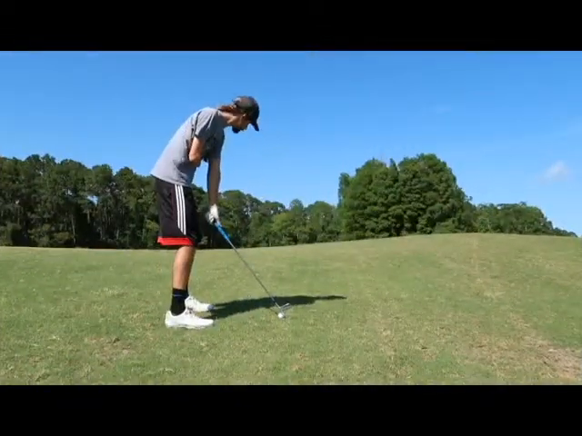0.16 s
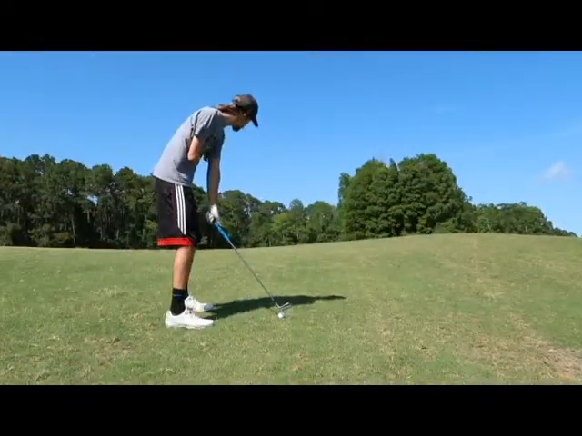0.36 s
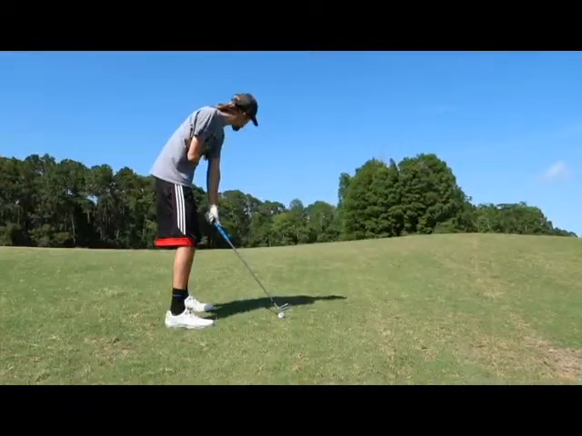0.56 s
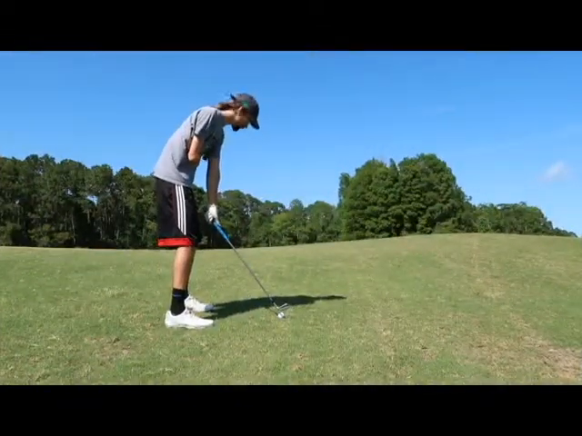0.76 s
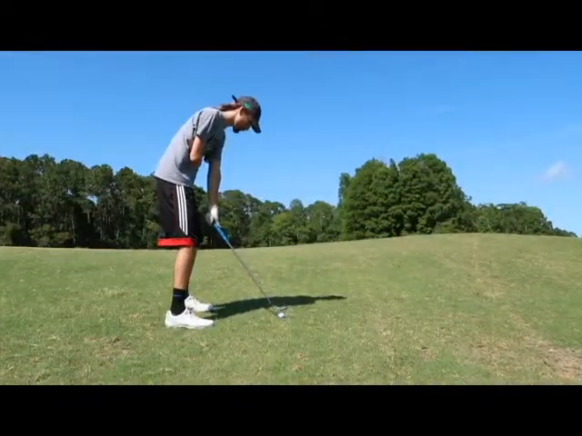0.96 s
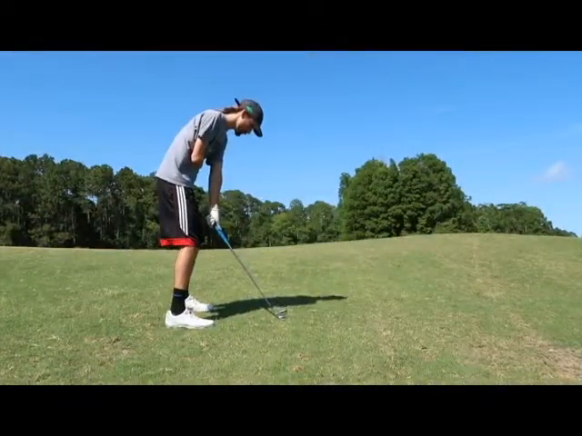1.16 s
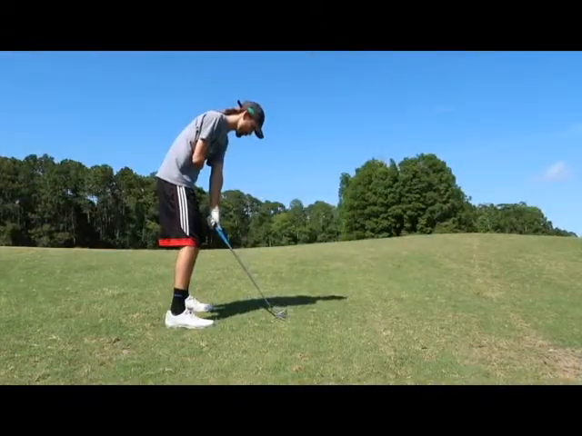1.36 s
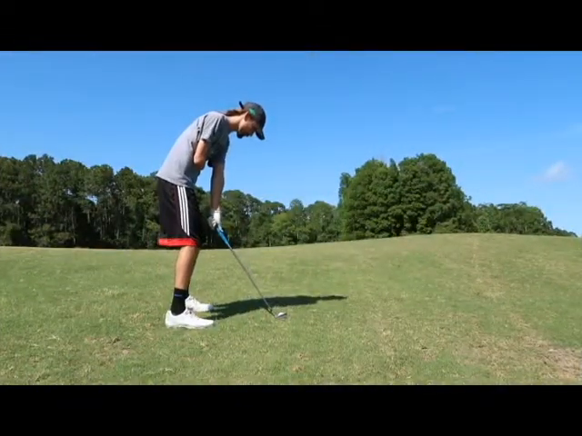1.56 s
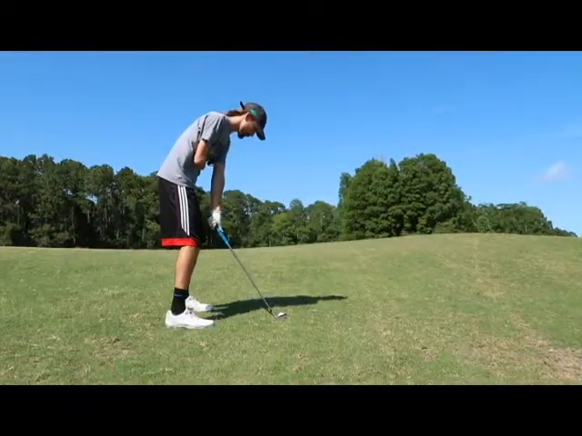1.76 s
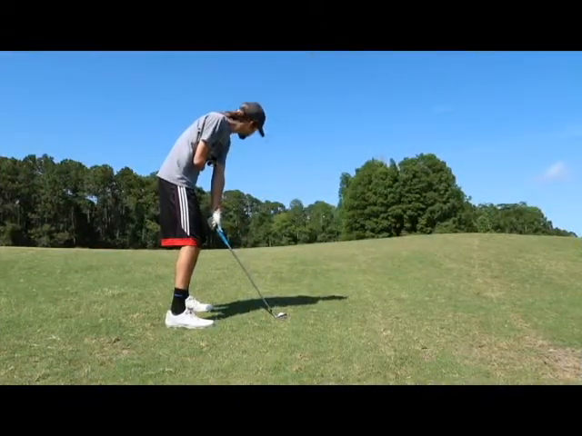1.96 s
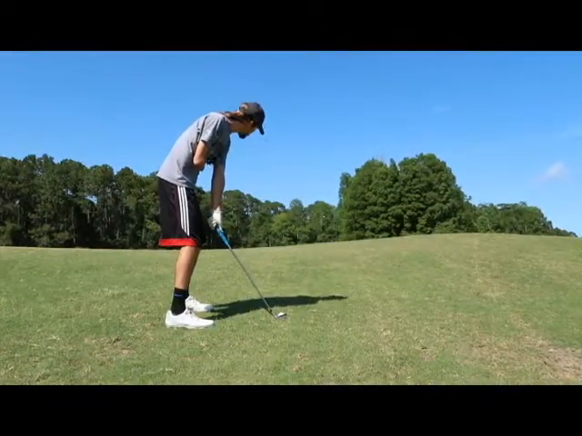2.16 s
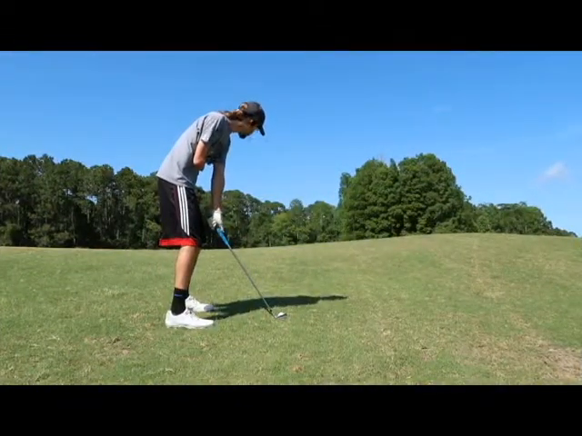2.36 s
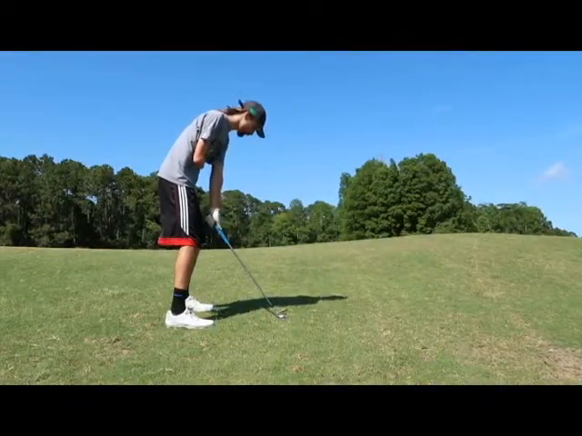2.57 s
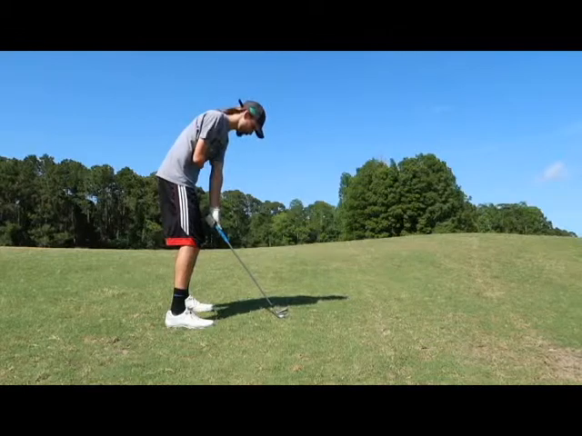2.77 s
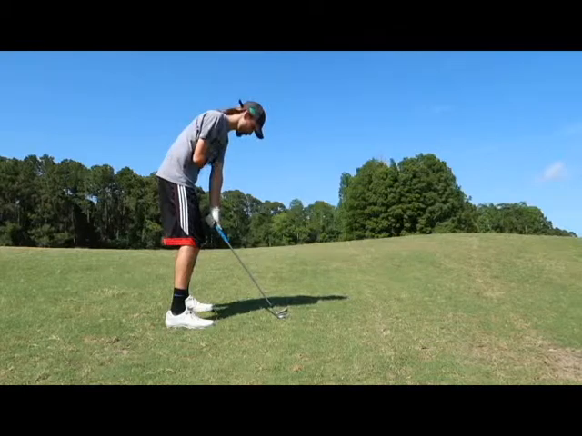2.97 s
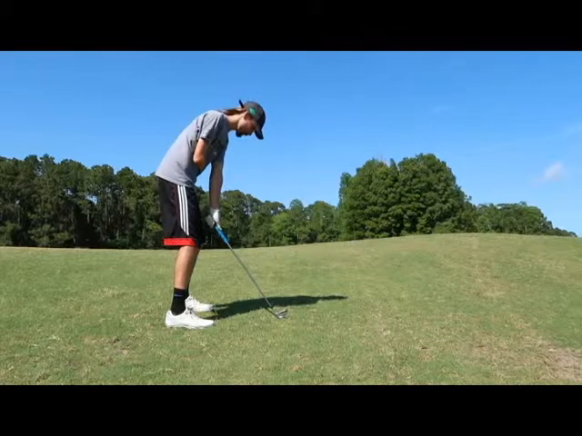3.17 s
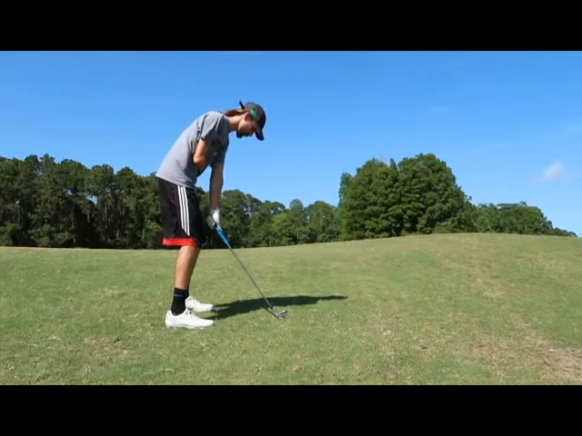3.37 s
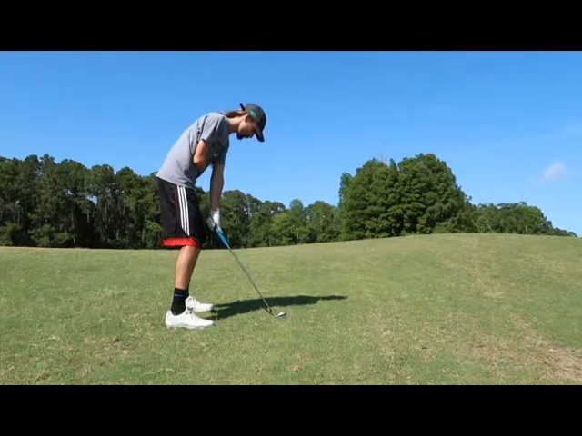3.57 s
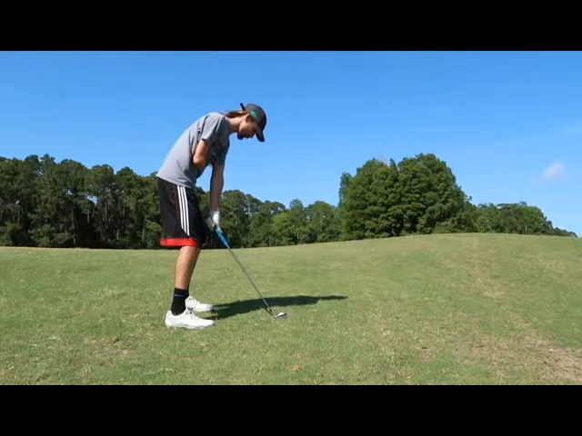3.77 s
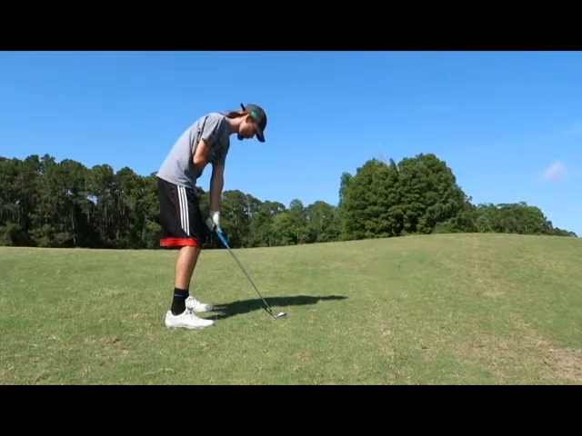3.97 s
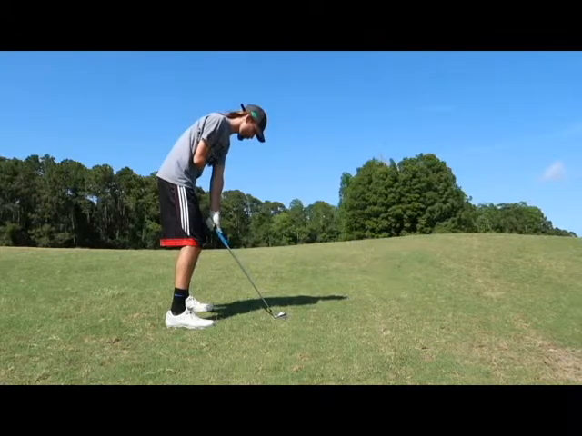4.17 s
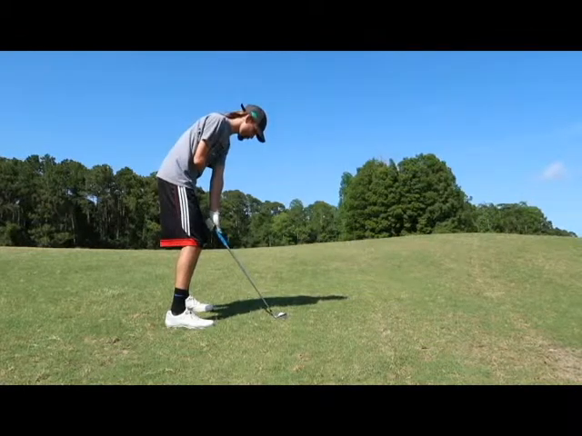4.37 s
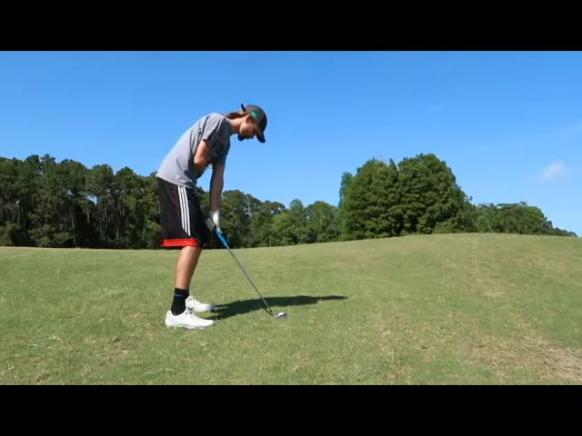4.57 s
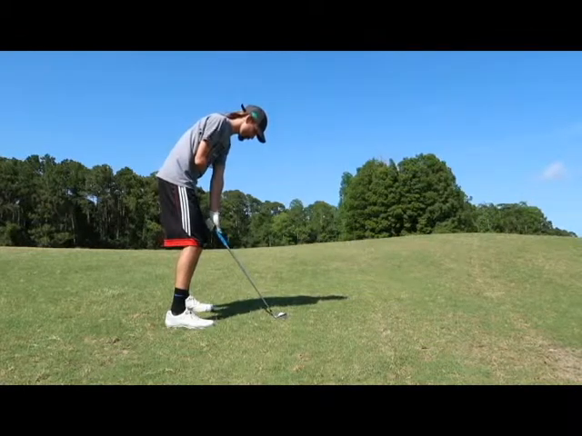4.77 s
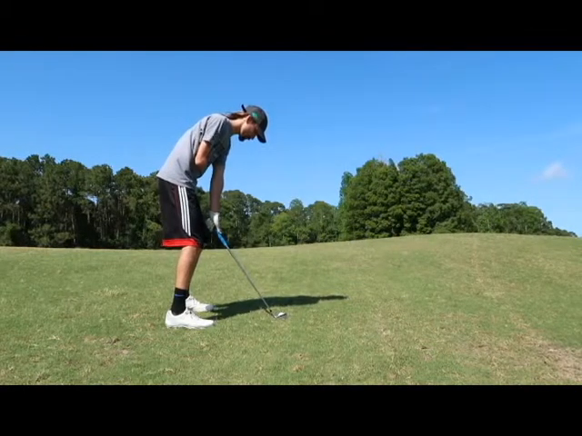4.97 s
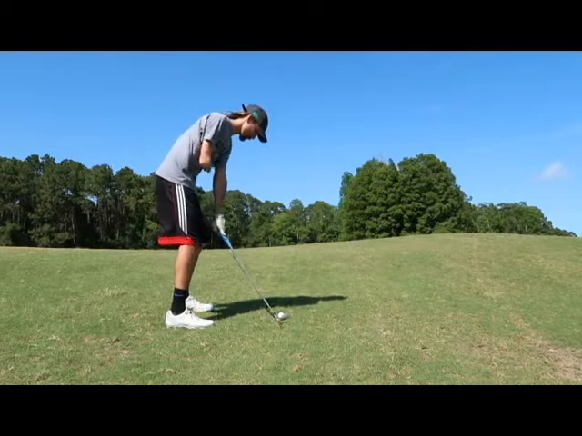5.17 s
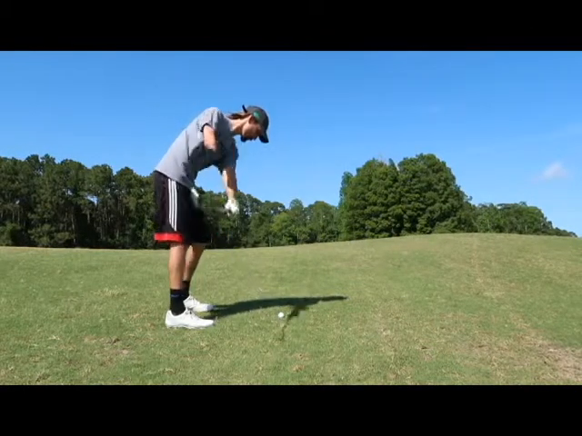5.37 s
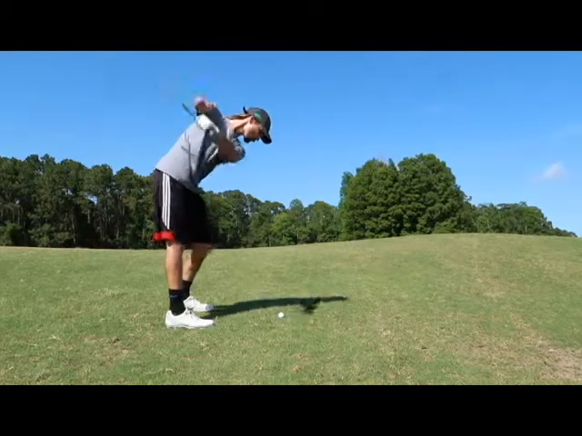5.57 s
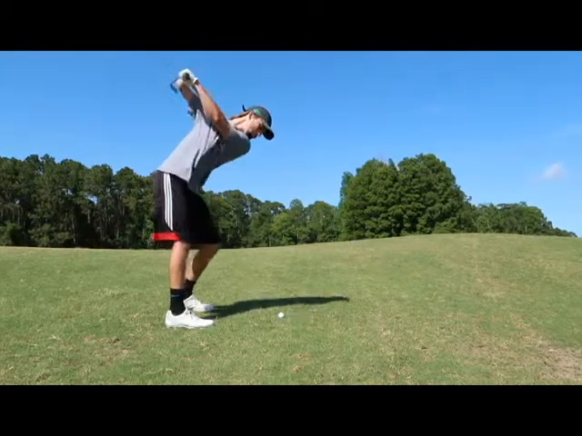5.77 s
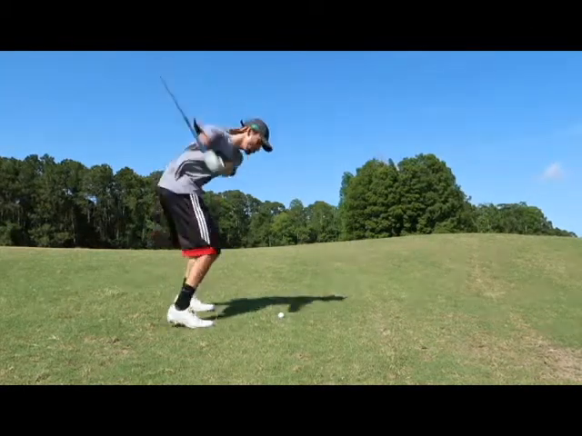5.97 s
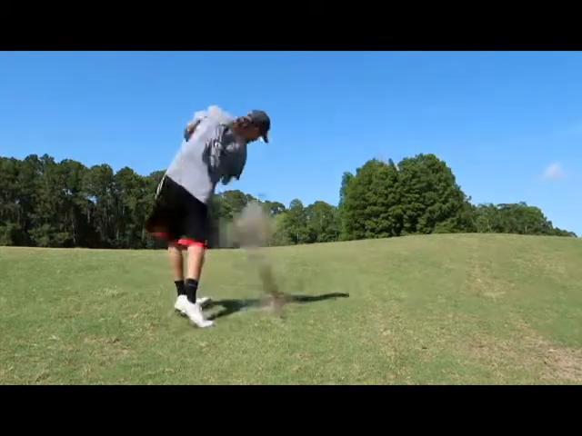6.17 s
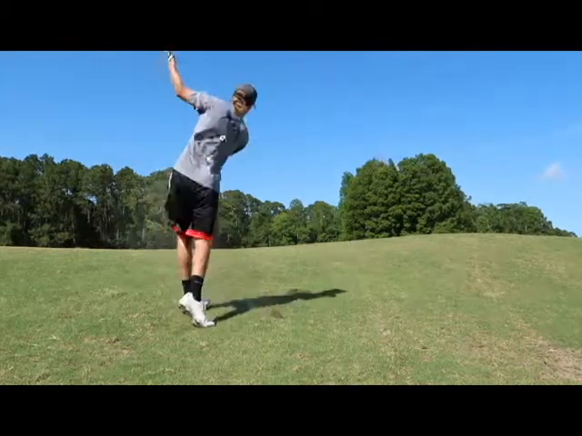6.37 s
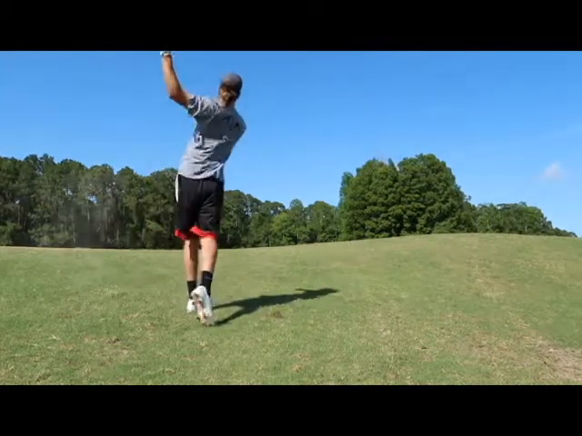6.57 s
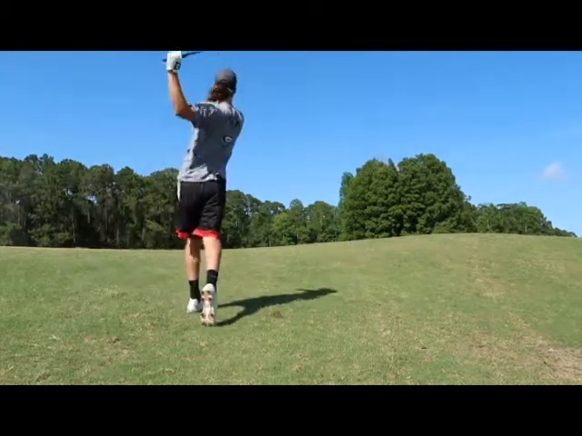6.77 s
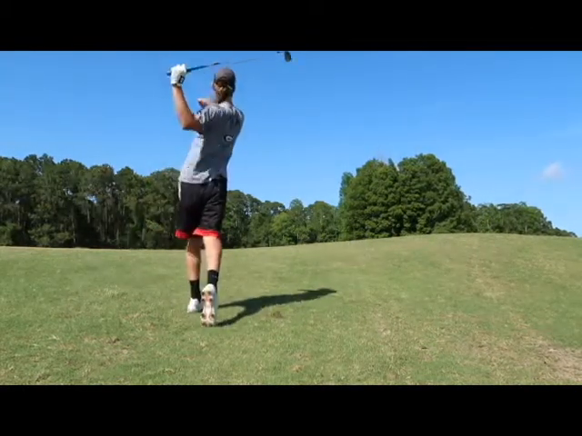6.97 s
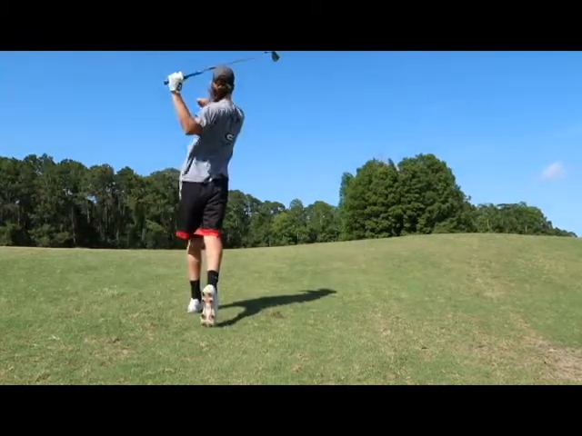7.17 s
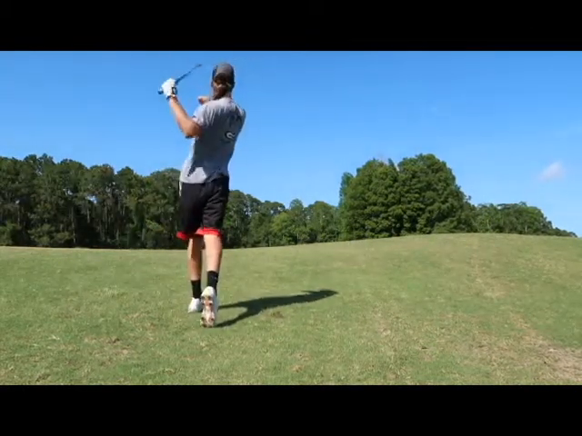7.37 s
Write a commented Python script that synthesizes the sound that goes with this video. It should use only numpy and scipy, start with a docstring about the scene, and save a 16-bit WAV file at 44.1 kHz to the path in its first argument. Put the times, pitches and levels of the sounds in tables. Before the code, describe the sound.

Outdoors on an open golf course, a far mower drones low and steady, its pulsing clatter coming and going in moving air. Wind bursts roughly against the microphone before the middle, then drops away. Late on, a club gives a brief rising swish and hits the ball with one dry, sharp crack and a short turf thud. Wind gusts return at the end. Close stereo camera microphone with faint hiss.

```python
"""An open fairway in gusty air, heard at two close microphone ports. A far four-cylinder mower drones as harmonics
of its firing rate and clatters as pulsed, coloured noise, all of it fading in the moving air.
Wind buffets the ports as swelling, coloured noise, with single gusts and tiny overload clicks. A golfer swings an
iron: the shaft swishes as gliding vortex noise, then contacts ring club head and ball while turf tears and thuds.
Loud spells make the camera's gain control duck."""
import sys
import numpy as np
from scipy import signal
from scipy.fft import rfft, irfft, next_fast_len
from scipy.io import wavfile
from scipy.ndimage import uniform_filter1d, map_coordinates

SR = 44100
rng = np.random.default_rng(int(sys.argv[2]) if len(sys.argv) > 2 else 0)


def to_wav(s):
    """Save 16-bit WAV."""
    ch = np.atleast_2d(s).T  # columns
    pcm = np.round(np.clip(ch, -1, 1) * 32767)  # PCM
    wavfile.write(sys.argv[1], SR, pcm.astype(np.int16))


N = 326781
T = np.arange(N) / SR  # time [s]

# Spectra below give relative levels: the coloured noise is scaled to rms 1, a snap to peak 1.

# rumble of the far outdoors: (frequency [Hz], level [dB per Hz])
DISTANCE_SPECTRUM = [(20, -24.5), (45, -8), (70, 4), (130, 5.5), (250, 3.5), (450, 0), (700, -4),
                     (1300, -10.5), (3000, -59)]
# microphone hiss: (frequency [Hz], level [dB per Hz])
HISS_SPECTRUM = [(500, -20), (1200, 4), (3000, 3), (4500, -3), (6000, -7.5), (8000, -11.5), (11000, -17.5),
                 (11900, -15), (12400, -50), (14000, -78)]

# speed of the governed engine: (time [s], firing rate [firings per s])
FIRING_RATE = [(0, 75.7), (2.2, 75.5), (4, 75.1), (7.4, 75.05)]
# strength of the four cylinders in firing order: level [dB]
CYLINDER_LEVELS = [0, -5.5, -6, -4]
# drone as the air carries it:
# (time [s], fundamental [dB], second harmonic [dB], low overtones [dB], high overtones [dB])
DRONE_LEVELS = [(0, -36.5, -38.5, -40.5, -48.5), (.75, -36.5, -40, -40, -57), (1.1, -36, -39, -39.5, -48.5),
                (1.55, -42.5, -43.5, -43.5, -48.5), (1.8, -35, -40.5, -53, -58),
                (2.2, -34.5, -38, -50, -53.5), (2.7, -35.5, -41, -42, -55), (3.3, -54, -54, -50, -51),
                (3.9, -45, -48.5, -53, -61), (4.3, -55, -45.5, -51.5, -56), (4.8, -49, -47.5, -53, -72),
                (5.3, -46, -48, -60, -57), (5.8, -46.5, -53.5, -58.5, -64), (7.4, -45.5, -42.5, -46, -67)]
# low exhaust overtones: (multiple of the firing rate, relative level [dB])
EXHAUST_TONES = [(3, -0.5), (4, -7), (5, -15), (6, -15.5)]
# high overtones from the engine block, before rounding to quarters:
# (multiple of the firing rate, relative level [dB])
BLOCK_OVERTONES = [(8, -2.5), (9.25, -11.5), (10.75, -6), (11, -3.5), (12.5, -5.5)]
# lines of the far machine whine: (frequency [Hz], relative level [dB])
WHINE_LINES = [(452, -53.5), (511.4, -56.5), (619, -61.5), (694, -57), (770, -61.5)]
# the whine as it comes and goes: (time [s], relative level [dB])
WHINE_LEVEL = [(0, -20), (2.8, -1.5), (3.6, 1.5), (4.8, -1.5), (5.8, 1), (7.4, -38)]

# engine clatter as the wind carries it, before trims:
# (time [s], knock level [dB], rattle level [dB], lag of the second path through the air [ms])
CLATTER_LEVELS = [(0, -35.5, -45, 0.85), (.2, -40.5, -51, 0.95), (.35, -39, -55, 0.85),
                  (.58, -51.5, -61, 0.9), (.76, -50.5, -48, 0.85), (.9, -43, -59, 0.97),
                  (1.07, -35, -69, 0.97), (1.2, -43, -51, 0.82), (1.32, -35.5, -46.5, 0.8),
                  (1.39, -38, -49, 0.98), (1.47, -28, -50, 0.86), (1.58, -32.5, -41.5, 0.87),
                  (1.68, -36.5, -49.5, 0.81), (1.78, -44, -55, 0.88), (1.88, -43, -45, 0.81),
                  (2.12, -42, -48.5, 0.86), (2.4, -36.5, -47, 0.83), (3, -45, -65, 0.93),
                  (3.25, -36.5, -56, 1.3), (3.42, -45.5, -52, 0.83), (3.65, -37.5, -56, 0.76),
                  (3.88, -37.5, -42.5, 0.76), (4.05, -45.5, -64, 0.95), (4.2, -42.5, -55, 0.67),
                  (4.33, -39.5, -49.5, 0.82), (4.44, -40, -59, 0.78), (4.56, -43, -58, 0.87),
                  (4.8, -49, -56, 0.73), (5.02, -44.5, -53.5, 0.81), (5.2, -43.5, -54.5, 0.74),
                  (5.43, -42.5, -53, 0.78), (5.7, -40, -60, 0.7), (6.3, -55, -58, 0.88),
                  (6.58, -56, -58, 0.84), (6.72, -47, -56, 0.65), (6.9, -50, -55, 0.78),
                  (7.41, -63.5, -60, 0.81)]
# level of the rattle's treble: (time [s], level [dB])
TREBLE_LEVEL = [(0, -58), (.25, -68), (1.45, -67), (1.6, -58), (1.75, -69), (2.2, -59), (2.5, -57),
                (2.9, -68), (3.3, -57), (3.65, -62.5), (3.88, -56), (4.1, -72), (4.55, -60.5), (4.85, -69),
                (5.1, -59), (5.25, -65), (5.45, -55.5), (5.7, -66.5), (7.41, -67.5)]
# the knocking block: (frequency [Hz], level [dB per Hz])
KNOCK_SPECTRUM = [(350, -12), (590, -8), (700, 4), (850, 4.5), (1050, -1.5), (1280, -2), (1700, -8.5),
                  (2300, -18), (4000, -51), (12000, -69)]
# the rattling covers: (frequency [Hz], level [dB per Hz])
RATTLE_SPECTRUM = [(900, -22), (1600, 3), (1950, 9), (2200, -2), (2600, 2), (2950, -9), (3300, -19.5),
                   (3700, -15.5), (4600, -23), (8000, -44.5), (12000, -79.5)]
# the rattle's treble: (frequency [Hz], level [dB per Hz])
TREBLE_SPECTRUM = [(2300, -24), (2850, 2.5), (3300, -2.5), (3800, -15.5), (5000, -38), (12000, -78.5)]
BLOW_SCATTER_DB = 1.5
ECHO_SHARE = 0.21  # steady floor under the blows, as a gain

# strength of the wind at the ports, before trim: (time [s], level [dB])
WIND_LEVEL = [(0, -45.5), (1.68, -41.5), (1.82, -35.5), (2, -34.5), (2.25, -38.5), (2.36, -23.5),
              (2.62, -18), (2.85, -26.5), (3.3, -49), (3.9, -57.5), (4.75, -56.5), (5, -70), (6.15, -59.5),
              (6.41, -31), (6.58, -31.5), (6.8, -37), (7.1, -30), (7.41, -30.5)]
# single gusts that hit the ports:
# (start [s], length [s], level [dB], centre [Hz], small eddies against the large [dB])
GUST_EVENTS = [(0.539, 0.078, -31.5, 193, -38), (1.021, 0.012, -26.5, 260, -20),
               (1.159, 0.022, -22, 230, -34), (1.305, 0.0067, -26.5, 253, -30),
               (1.563, 0.0048, -26.5, 255, -36), (1.773, 0.0081, -23.5, 272, -33),
               (1.81, 0.032, -27, 132, -35), (2.111, 0.06, -26, 171, -29), (2.31, 0.033, -22.5, 94.6, -36),
               (2.35, 0.033, -20, 219, -30), (2.417, 0.015, -17, 213, -19.5),
               (2.486, 0.02, -17, 214, -24.5), (2.544, 0.022, -11.5, 247, -29),
               (2.578, .014, -14, 252, -30), (2.609, 0.03, -9, 247, -18), (2.646, 0.012, -4, 166, -25),
               (2.664, 0.012, -1.5, 357, -7.5), (2.68, 0.016, -5.5, 340, -19), (2.703, 0.0083, -5, 360, -4),
               (2.722, 0.017, -8, 311, -35), (2.755, 0.009, -6.5, 272, -21),
               (2.771, 0.015, -3.5, 380, -3.5), (2.793, 0.0067, -5.5, 380, -4.5),
               (2.806, 0.0061, -10, 350, -12), (2.821, 0.011, -14.5, 362, -11),
               (2.874, 0.0073, -17, 397, -2), (2.887, 0.013, -13, 354, -20),
               (2.92, 0.014, -17.5, 360, -24.5), (2.941, 0.028, -17, 330, -34),
               (2.986, 0.0046, -23, 320, -14), (3.035, 0.055, -29.5, 280, -22),
               (3.131, 0.024, -25, 274, -28), (3.46, 0.026, -24.5, 253, -38),
               (3.489, 0.071, -23.5, 293, -16), (3.785, 0.015, -28.5, 223, -35),
               (3.973, .05, -41, 84.5, -38), (4.473, 0.013, -27.5, 291, -18),
               (4.756, 0.019, -28.5, 122, -38), (4.801, 0.0033, -19.5, 240, -31),
               (6.224, 0.015, -29.5, 248, -33), (6.317, 0.017, -31.5, 232, -35),
               (6.377, 0.0063, -23, 238, -38), (6.402, 0.042, -30.5, 240, -35),
               (6.451, 0.056, -24.5, 244, -42), (6.56, 0.012, -21, 233, -22),
               (6.648, 0.035, -20.5, 247, -38), (6.739, 0.0049, -27, 246, -33),
               (6.986, 0.037, -12.5, 306, -21.5), (7.025, 0.016, -15, 275, -23.5),
               (7.044, 0.021, -16.5, 300, -25), (7.114, 0.014, -20, 270, -25),
               (7.127, 0.008, -9.5, 244, -15.5), (7.141, 0.0083, -14, 384, -5), (7.15, 0.012, -11, 320, -9),
               (7.167, 0.013, -13.5, 320, -14.5), (7.188, 0.012, -11.5, 319, -16),
               (7.225, 0.011, -10.5, 335, -10), (7.241, .011, -10, 292, -24.5),
               (7.259, 0.011, -12, 327, -16), (7.293, 0.026, -12.5, 302, -20.5),
               (7.329, 0.017, -15.5, 232, -24), (7.353, 0.011, -14, 238, -26)]
# turbulence around its centre: (frequency / centre [ratio], level [dB per Hz])
EDDY_SPECTRUM = [(.08, -35), (.25, -6), (.55, 1), (1.1, 3.5), (1.6, -0.5), (2.3, -16), (3.6, -34), (7, -70),
                 (16, -66.5), (35, -83), (50, -100)]
# the smallest eddies of fast air: (frequency [Hz], level [dB per Hz])
FINE_EDDY_SPECTRUM = [(300, -25), (650, 8), (1000, 0.5), (1500, -10.5), (2100, -24), (2800, -37),
                      (5000, -52), (10000, -65), (15000, -92.5)]
GUST_EDGE_S, GUST_SAG_DB_PER_S = 0.0034, 63  # a gust sets in fast and slackens while it lasts
WAKE_DB = -15  # weaker eddies ahead of a gust and behind it
LEAD_S, WAKE_S = 0.02, 0.021  # decay times of those eddies, ahead and behind
EDDY_LIFE_S = 0.02
APART_AT_FULL, APART_GROWTH = 0.42, 1  # share that differs between the ports at 0 dB; dB it gains per dB of wind

# clicks as strong gusts overload the microphone ports: (time [s], peak level [dB])
CLICK_EVENTS = [(2.646, -34), (2.753, -46), (2.764, -32), (2.774, -38), (2.783, -31.5), (2.828, -42),
                (2.924, -49), (6.977, -39), (7.03, -40), (7.126, -36), (7.147, -38), (7.158, -40),
                (7.169, -36.5), (7.179, -38), (7.275, -37.5)]
# an overload click: (frequency [Hz], level [dB per Hz])
CLICK_SPECTRUM = [(500, -9), (1800, 5), (4000, 4.5), (6000, -3), (10000, -14.5), (15000, -21)]

# downswing, before flutter: (time [s], level [dB], vortex centre [Hz])
SWING_PATH = [(6.04, -66, 808), (6.075, -44, 993), (6.1, -36.5, 1316), (6.13, -32.5, 1684),
              (6.143, -43, 1654), (6.17, -51, 1582), (6.2, -51, 1447), (6.3, -69, 1210)]
# vortex noise around its centre: (frequency / centre [ratio], level [dB per Hz])
VORTEX_SPECTRUM = [(.1, -10), (.3, 4.5), (.55, 1.5), (1, -3), (2, -7.5), (3.2, -15), (6, -28), (10, -35)]
SWISH_FLUTTER_DB, SWISH_FLUTTER_PER_S = 2.2, 180

# club head meeting turf, ball and turf again: (time [s], relative level [dB], decay time of the push [ms])
CONTACT_EVENTS = [(6.1462, -10, 0.5), (6.1473, -8, 0.21), (6.1483, 3, 0.011), (6.1516, -16, 0.04),
                  (6.157, -15, 0.6), (6.1593, -17, 0.2)]
# ring of club head and ball: (frequency [Hz], relative level [dB], time to fall 60 dB [s])
CLUB_RING = [(470, -7, 0.022), (686, -20, 0.022), (850, -4.5, 0.019), (1030, -27, 0.034), (1250, -13, 0.02),
             (1510, -21, 0.025), (1710, -6, 0.018), (1930, -17, 0.02), (2250, -26, 0.016),
             (2600, -7, 0.015), (2910, -6, 0.015), (3530, -5.5, 0.016), (3680, -31, 0.04), (3770, -22, .02),
             (4140, -18, 0.016), (4500, -23, 0.013), (4970, -22, 0.014), (7200, -17, .009),
             (8340, -2, 0.0034), (9900, -2.5, 0.0033), (12400, -8, 0.0048)]
# crack of a contact: (frequency [Hz], level [dB per Hz])
CRACK_SPECTRUM = [(80, -30), (200, 9), (420, 18.5), (1000, 5.5), (1800, 13.5), (2500, -2), (4200, 7),
                  (5200, -4), (5800, -24), (6700, -5), (8300, -3), (12000, -18), (16000, -27)]
# tearing turf: (frequency [Hz], level [dB per Hz])
TURF_SPECTRUM = [(60, -20), (140, 4), (400, -5), (1600, 6), (2900, 4), (4000, 2.5), (6000, -10),
                 (9000, -15), (15000, -30)]
SOIL_SPREAD_DB, SPRAY_SPREAD_DB = 3.5, 6
THUD_HZ, THUD_DB, THUD_T60_S = 144, -27, 0.078  # the ground gives under the blade
STRIKE_LOW_CUT_HZ = 210  # so small a source radiates no deep bass

TOP_HZ = 16300  # upper edge of the camera's sound


def undb(db):
    """Decibels to gain."""
    return 10 ** (np.asarray(db) / 20)


def unit(x):
    """Scale to rms 1."""
    return x / np.sqrt(np.mean(x ** 2) + 1e-18)


def curves(rows):
    """The columns of a timed table, joined by straight lines."""
    times, *columns = np.transpose(rows)
    return [np.interp(T, times, column) for column in columns]


def gains(spectrum, hz):
    """Gain of a spectrum at the given frequencies, straight in dB over log frequency."""
    table_hz, db = np.transpose(spectrum)
    return undb(np.interp(np.log(hz + 1e-9), np.log(table_hz), db))


def colour(x, spectrum, centre=1):
    """Give noise a spectrum; rms 1."""
    size = x.shape[-1]
    padded = next_fast_len(size)
    hz = np.arange(padded // 2 + 1) * SR / padded
    shaped = rfft(x, padded) * gains(spectrum, hz / centre)
    return unit(irfft(shaped, padded)[..., :size])


def ports(apart, size=N):
    """White noise at two ports; the power share `apart` is opposite between them."""
    mid, side = rng.standard_normal((2, size))
    apart = np.clip(apart, 0, 0.7)
    return np.sqrt(1 - apart) * mid + np.sqrt(apart) * np.array([side, -side])


def walk(rate, size=N):
    """Smooth random wander with a spread near 1, taking `rate` new values per second."""
    step = max(int(SR / rate), 2)
    held = np.repeat(rng.standard_normal(size // step + 2), step)
    return np.sqrt(3 / 2) * uniform_filter1d(held, step)[:size]


def snap(spectrum, size):
    """The shortest causal pulse with a given spectrum (minimum phase); peak 1."""
    hz = np.arange(size // 2 + 1) * SR / size
    cepstrum = irfft(np.log(gains(spectrum, hz)))
    # fold the backward half of the cepstrum onto the forward half
    cepstrum[1:size // 2] *= 2
    cepstrum[size // 2 + 1:] = 0
    pulse = irfft(np.exp(rfft(cepstrum)))
    return pulse / np.abs(pulse).max()


def lag_left(x, lag_s):
    """Sound from the right reaches the left port a little later."""
    left, right = np.broadcast_to(x, (2, N))
    return np.array([np.interp(T - lag_s, T, left), right])


def breeze(distance_db=-44.5, hiss_db=-57):
    """The far rumble of open air, gently wavering, and a steady, wide hiss."""
    rumble = colour(ports(0.0003), DISTANCE_SPECTRUM)
    hiss = colour(ports(0.43), HISS_SPECTRUM)
    return undb(distance_db + 2.7 * walk(5.4)) * rumble + undb(hiss_db) * hiss


def whine(waver_db=2, pitch_wander=0.00363):
    """Far machine whine: sine lines that wander in pitch and level and swell together."""
    swell_db, = curves(WHINE_LEVEL)
    out = np.zeros(N)
    for line_hz, db in WHINE_LINES:
        phase = 2 * np.pi * np.cumsum(line_hz * (1 + pitch_wander * walk(14))) / SR
        out += undb(db + swell_db + waver_db * walk(6.4)) * np.sin(phase)
    return out


def drone(cycle, waver_db=1.1, overtone_waver_db=2.5, throb=0.29):
    """Exhaust and block harmonics from far off; moving air makes each one fade on its own."""
    first_db, second_db, low_db, high_db = curves(DRONE_LEVELS)
    phase = 2 * np.pi * cycle
    count = len(CYLINDER_LEVELS)
    out = undb(first_db + waver_db * walk(16)) * np.sin(phase)
    out += undb(second_db + waver_db * walk(11)) * np.sin(2 * phase)
    for overtones, level_db in (EXHAUST_TONES, low_db), (BLOCK_OVERTONES, high_db):
        for multiple, db in overtones:
            # the engine repeats every four firings, so overtones sit on quarter multiples
            order = round(multiple * count) / count
            tone = np.sin(order * phase + 2 * np.pi * rng.random())
            out += undb(level_db + db + overtone_waver_db * walk(8.9)) * tone
    # unequal cylinders make the drone throb once in four firings
    out *= 1 + throb * np.cos(phase / count)
    return np.sqrt(2) * (out + whine())  # sine levels are rms


def fading(x, depth_db, rate, count=16):
    """Turbulent air on the way lets each narrow band swell and sink by itself."""
    padded = next_fast_len(N)
    spectrum = rfft(x, padded)
    hz = np.arange(padded // 2 + 1) * SR / padded
    # overlapping triangular bands, evenly spaced in log frequency
    place = np.interp(np.log(hz + 1), np.log([600, 4500]), [0, count - 1])
    out = np.zeros(N)
    for k in range(count):
        band = irfft(spectrum * np.maximum(1 - np.abs(place - k), 0), padded)[:N]
        out += band * undb(depth_db * walk(rate))
    return unit(out)


def second_path(x, lag_ms, gain):
    """Sound also comes by a longer way; as the wind shifts it, peaks and hollows slide through the spectrum."""
    late = np.interp(T - lag_ms / 1000, T, x)
    return (x + gain * late) / np.hypot(1, gain)


def clatter(cycle, knock_trim_db=-1.0, rattle_trim_db=0.65, knock_path_db=-7, rattle_path_db=-8):
    """Each firing knocks the block and rattles its covers, one cylinder hardest; tree echoes fill the gaps."""
    firing = cycle.astype(int)
    scatter_db = BLOW_SCATTER_DB * rng.standard_normal(N)[firing]
    blow_db = np.array(CYLINDER_LEVELS)[firing % len(CYLINDER_LEVELS)] + scatter_db
    # a blow builds quickly and dies away before the next firing
    ring = np.sin(np.pi * np.sqrt(cycle % 1)) ** 3
    blows = np.hypot(undb(blow_db) * ring, ECHO_SHARE)
    knock_db, rattle_db, lag_ms = curves(CLATTER_LEVELS)
    treble_db, = curves(TREBLE_LEVEL)
    block = fading(colour(blows * rng.standard_normal(N), KNOCK_SPECTRUM), depth_db=3.5, rate=12)
    covers = fading(colour(blows * rng.standard_normal(N), RATTLE_SPECTRUM), depth_db=3.5, rate=18)
    treble = colour(blows * rng.standard_normal(N), TREBLE_SPECTRUM)
    block = second_path(block, lag_ms, undb(knock_path_db))
    covers = second_path(covers, lag_ms, undb(rattle_path_db))
    out = undb(knock_db + knock_trim_db) * block
    out += undb(rattle_db + rattle_trim_db) * covers
    return out + undb(treble_db) * treble


def mower(wander=0.0012, left_lag_s=0.000042):
    """One firing count drives drone and clatter; the clatter arrives from the right."""
    firing_hz, = curves(FIRING_RATE)
    cycle = np.cumsum(firing_hz * (1 + wander * walk(9))) / SR
    return drone(cycle) + lag_left(clatter(cycle), left_lag_s)


def apart_at(db):
    """Harder wind is less alike at the two ports."""
    return APART_AT_FULL * undb(APART_GROWTH * db)


def buffeting(trim_db=-1, centre_hz=175, puff_db=6, puffs_per_s=32, clump_db=3, spread=3.7):
    """The wind rumbles on the ports in small random puffs, swelling and dropping with its strength."""
    db, = curves(WIND_LEVEL)
    puffs = unit(undb(puff_db * np.tanh(walk(puffs_per_s)) + clump_db * np.tanh(walk(300))))
    eddies = colour(ports(spread * apart_at(db)) * puffs, EDDY_SPECTRUM, centre_hz)
    return undb(db + trim_db) * eddies


def evened(x):
    """Hold the power of turbulence steady over spans longer than one eddy."""
    power = uniform_filter1d(np.mean(x ** 2, axis=0), int(EDDY_LIFE_S * SR))
    return unit(x / np.sqrt(power + np.mean(power) / 10))


def gusts(clump_db=7.0, fine_spread=5.8):
    """Each gust is a clump of large and small eddies on the ports; harder ones are less alike left and right."""
    out = np.zeros((2, N))
    margin, size = SR // 8, SR // 3  # room around a gust and noise to fill it [samples]
    for start, length, db, centre_hz, small_db in GUST_EVENTS:
        first = int(start * SR) - margin
        last = min(int((start + length) * SR) + margin, N)
        clumps = undb(clump_db * np.tanh(walk(300, size)))
        large = evened(colour(ports(apart_at(db), size) * clumps, EDDY_SPECTRUM, centre_hz))
        # strong, fast air breaks up into small eddies that tear and sputter
        small = evened(colour(ports(fine_spread * apart_at(db), size) * clumps, FINE_EDDY_SPECTRUM))
        eddies = (large + undb(small_db) * small)[:, :last - first]
        age = T[first:last] - start
        inside = np.clip(age, 0, length)
        outside = np.abs(age - inside)  # time from the nearer edge of the gust [s]
        body = np.exp(-(outside / GUST_EDGE_S) ** 2)
        skirt = undb(WAKE_DB) * np.exp(-outside / np.where(age < 0, LEAD_S, WAKE_S))
        shape = np.maximum(body, skirt)
        sag_db = GUST_SAG_DB_PER_S * (length / 2 - inside)
        # scale by the rms inside the gust, so its level holds at mid-gust
        strength = np.sqrt(np.sum(body * np.mean(eddies ** 2, axis=0)) / np.sum(body))
        out[:, first:last] += undb(db + sag_db) * shape * eddies / strength
    return out


def overload_clicks(size=512):
    """Strong gusts overload the ports in tiny dry clicks, each a minimum-phase pulse at a listed time."""
    out = np.zeros(N)
    for s, db in CLICK_EVENTS:
        first = int(s * SR)
        out[first:first + size] += undb(db) * snap(CLICK_SPECTRUM, size)
    return out


def swish():
    """The shaft sheds vortices whose pitch follows its speed: noise replayed at a gliding rate."""
    db, centre_hz = curves(SWING_PATH)
    db = db + SWISH_FLUTTER_DB * walk(SWISH_FLUTTER_PER_S)
    active = (T > SWING_PATH[0][0]) & (T < SWING_PATH[-1][0])
    centre_hz = centre_hz[active]
    vortices = colour(ports(0.0037, SR), VORTEX_SPECTRUM, centre_hz.max())
    travel = np.cumsum(centre_hz / centre_hz.max())  # read position in the noise [samples]
    gliding = np.array([map_coordinates(v, [travel], order=3) for v in vortices])
    out = np.zeros((2, N))
    out[:, active] = undb(db[active]) * gliding
    return out


def impact(ring_db=-9, crack_db=-3, size=8192):
    """Each contact pushes club head and ball, which crack and ring in decaying modes."""
    t = np.arange(size) / SR
    ring = np.zeros(size)
    for hz, db, t60 in CLUB_RING:
        ring += undb(db) * np.sin(2 * np.pi * hz * t) * undb(-60 * t / t60)
    response = undb(ring_db) * ring + undb(crack_db) * snap(CRACK_SPECTRUM, size)
    force = np.zeros(N)
    for s, db, contact_ms in CONTACT_EVENTS:
        # a softer contact is a longer, duller push
        push = np.exp(-1000 * t / contact_ms)
        first = int(s * SR)
        force[first:first + size] += undb(db) * push / push.sum()
    return signal.fftconvolve(force, response)[:N]


def divot(start_s=6.1458, tear_db=-18, tear_t60_s=0.042, spray_db=-46, spray_t60_s=0.2):
    """The blade tears the turf, soil sprays away in uneven crumbs, and the ground thuds as a decaying sine."""
    age = np.maximum(T - start_s, 0)
    crumbs = unit(undb(SPRAY_SPREAD_DB * np.tanh(walk(220))))
    tear = undb(tear_db - 60 * age / tear_t60_s)
    spray = crumbs * undb(spray_db - 60 * age / spray_t60_s)
    soil = colour(ports(0.027) * undb(SOIL_SPREAD_DB * walk(900)), TURF_SPECTRUM)
    thud = undb(THUD_DB - 60 * age / THUD_T60_S) * np.sin(2 * np.pi * THUD_HZ * age)
    return (T > start_s) * (tear + spray) * soil + thud


def strike():
    """Club, ball and ground together, with the deep bass cut as from a small source."""
    low_cut = signal.butter(2, STRIKE_LOW_CUT_HZ, "high", fs=SR, output="sos")
    return signal.sosfilt(low_cut, impact() + divot())


def scene(overload=2.5, strike_lag_s=0.000008):
    """Everything that reaches the two ports; the capsules round off the hardest gusts."""
    wind = overload * np.tanh((buffeting() + gusts()) / overload)
    return breeze() + mower() + wind + overload_clicks() + swish() + lag_left(strike(), strike_lag_s)


def close_ports(x, alike_hz=260, width_db=2):
    """The ports sit so close that the bass is the same in both; the rest of the difference is widened."""
    mid, side = (x[0] + x[1]) / 2, (x[0] - x[1]) / 2
    low_cut = signal.butter(2, alike_hz, "high", fs=SR, output="sos")
    side = undb(width_db) * signal.sosfilt(low_cut, side)
    return mid + np.array([side, -side])


def gain_control(x, top_db=-16, window_s=0.036, recover_db_per_s=9, bass_hz=110, bass_share=0.41):
    """Loud spells push the gain down, the bass furthest, and it creeps back at a steady rate."""
    pole = np.exp(-1 / (window_s * SR))
    power = signal.lfilter([1 - pole], [1, -pole], np.mean(x ** 2, axis=0))
    over_db = np.maximum(10 * np.log10(power + 1e-12) - top_db, 0)
    # hold each peak, then let it go at the recovery rate
    held_db = np.maximum.accumulate(over_db + recover_db_per_s * T) - recover_db_per_s * T
    bass = signal.sosfiltfilt(signal.butter(2, bass_hz, fs=SR, output="sos"), x)
    ducked_bass = bass * undb(-bass_share * held_db)
    return (x - bass + ducked_bass) * undb(-held_db)


def record(dry):
    """The camera rides the gain, stops at full scale and cuts the top."""
    limited = np.clip(gain_control(close_ports(dry)), -1, 1)
    top_cut = signal.ellip(8, 0.2, 70, TOP_HZ, fs=SR, output="sos")
    return signal.sosfilt(top_cut, limited)


dry = scene()
out = record(dry)
to_wav(out)
```